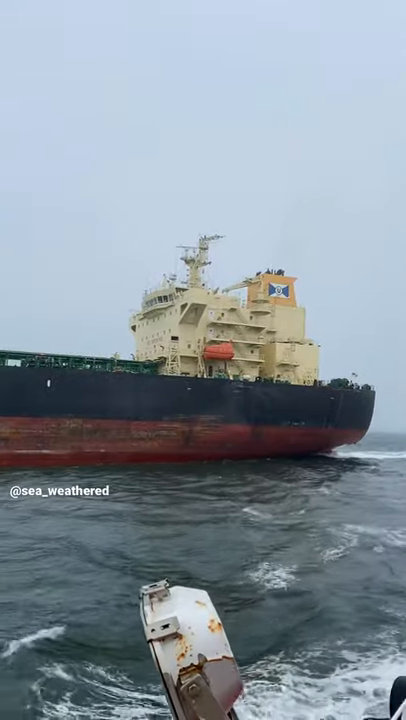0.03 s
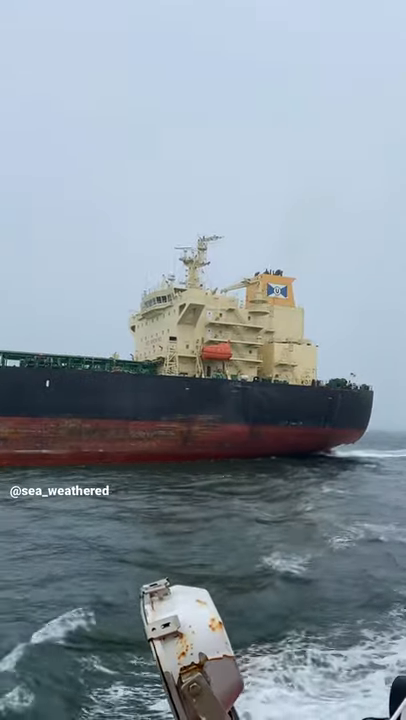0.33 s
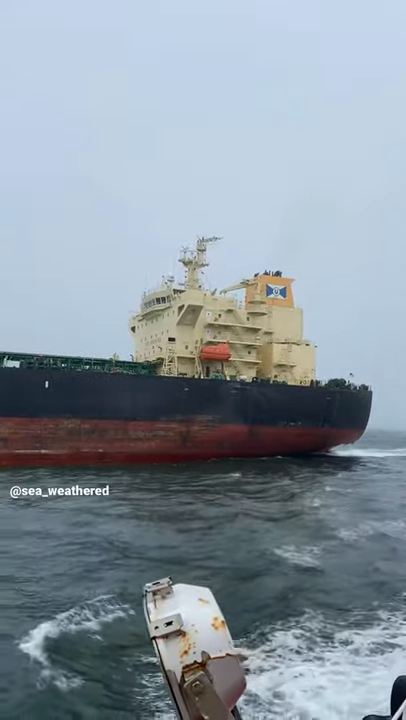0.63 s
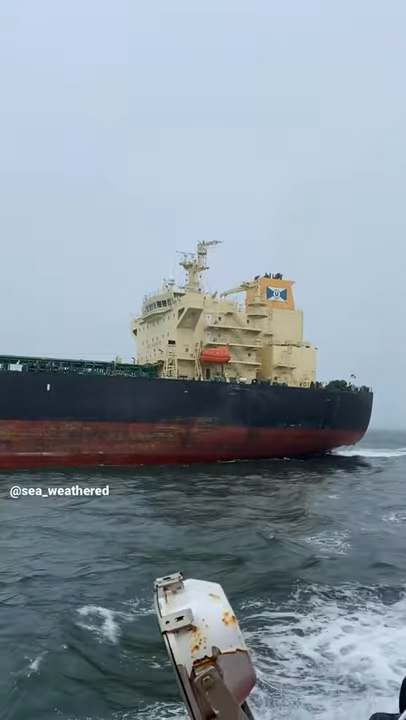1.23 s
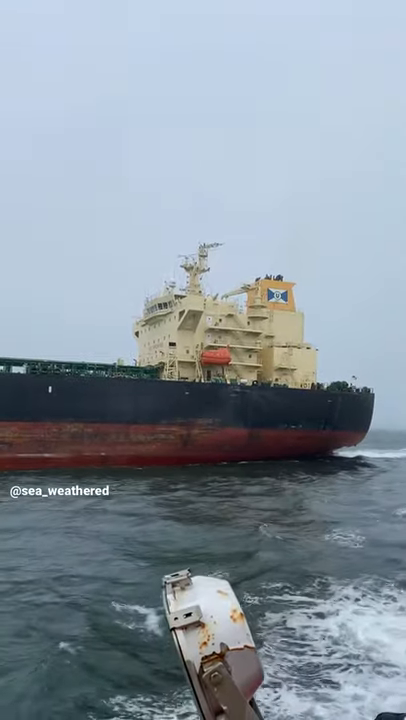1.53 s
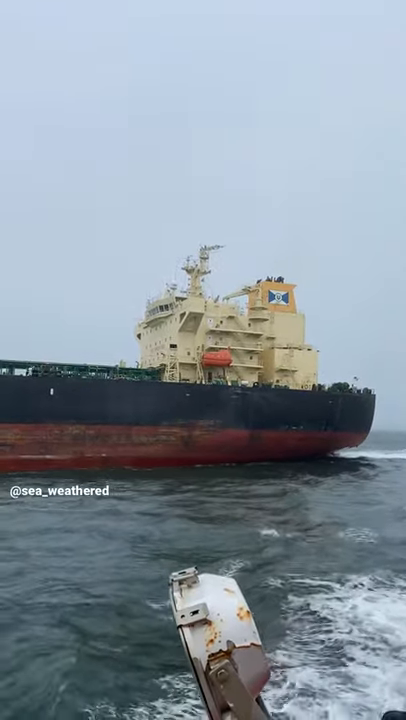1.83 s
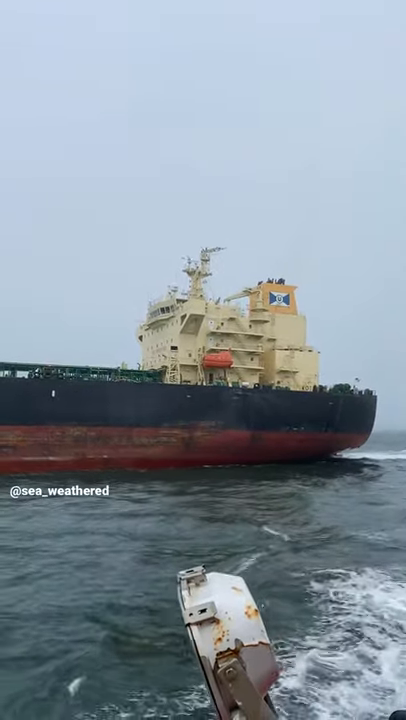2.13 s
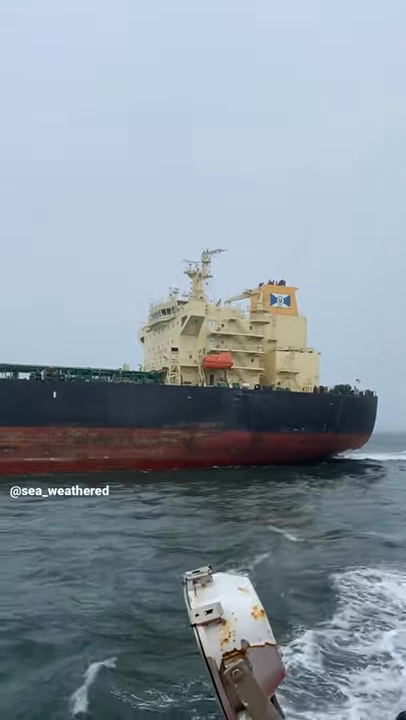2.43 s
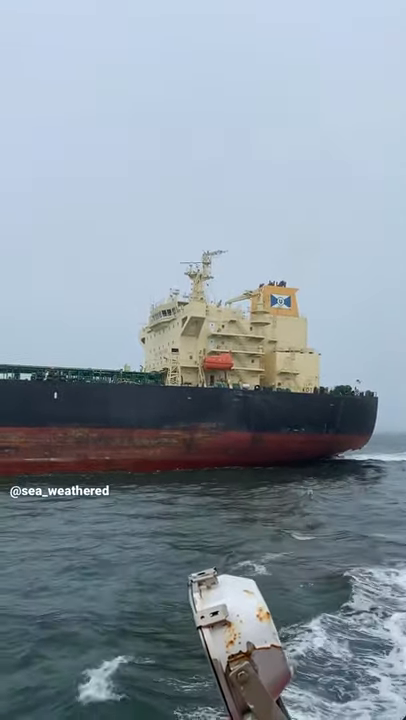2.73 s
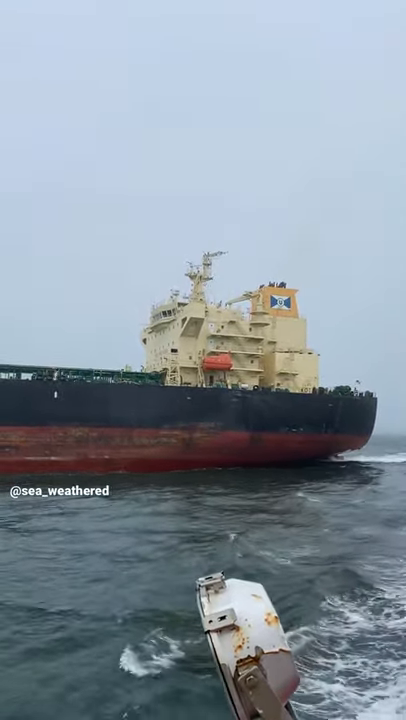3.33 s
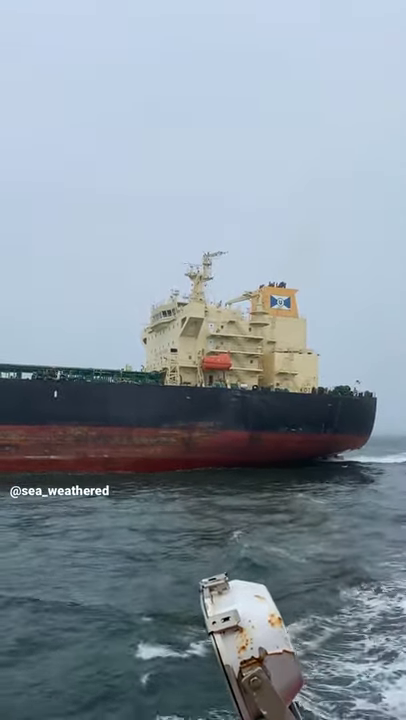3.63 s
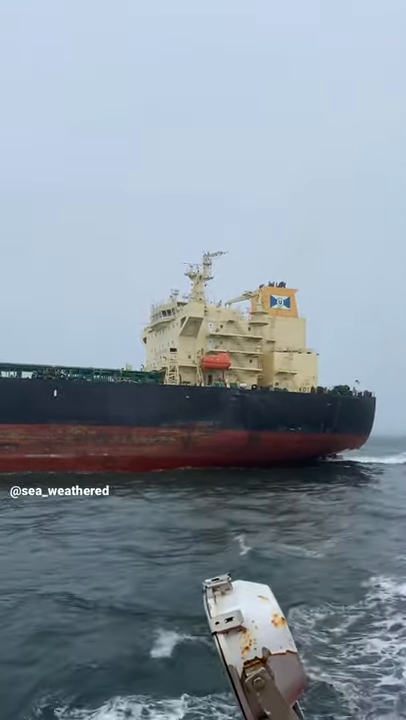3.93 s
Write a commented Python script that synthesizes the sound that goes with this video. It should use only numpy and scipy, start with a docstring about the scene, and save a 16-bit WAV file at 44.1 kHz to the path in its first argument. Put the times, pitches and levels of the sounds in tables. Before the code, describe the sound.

One long, deep ship horn blast carries across the water above a small boat's engine.

```python
"""A small boat's engine drones over the wash of water. Then a tanker sounds one long, deep horn blast across a
foggy bay, and the engine and wash drop in level beneath it. The horn catches with a puff of air, mostly on its
second and third partials (tones at whole multiples of its pitch), overshoots in pitch and settles near 128 Hz.
Its sound crosses the water by several shifting paths, so the partials swell and fade."""
import sys
import numpy as np
from scipy import signal
from scipy.fft import rfft, irfft
from scipy.io import wavfile
from scipy.ndimage import uniform_filter1d, minimum_filter1d

SR = 44100
rng = np.random.default_rng(int(sys.argv[2]) if len(sys.argv) > 2 else 0)


def generate_wav(signal):
    """Clip the signal to [-1, 1] and save it as 16-bit WAV at the path in sys.argv[1]."""
    frames = np.transpose(np.atleast_2d(signal))
    scaled = np.clip(frames, -1, 1) * 32767
    pcm = np.round(scaled).astype(np.int16)
    wavfile.write(sys.argv[1], SR, pcm)


N = 176400

# the horn's pitch: t/s, f/Hz
HORN_PITCH = [(.66, 130), (.705, 125.3), (.78, 131), (.85, 129.2), (.95, 128.4), (1.8, 128.05),
              (3.2, 127.95), (4, 127.7)]
SETTLED_HZ = HORN_PITCH[-1][1]
TIME = np.arange(N) / SR


def from_db(db):
    """Turn decibels into a gain to multiply by."""
    return 10 ** (np.asarray(db) / 20)


def rms_one(x):
    """Scale a signal so its average strength (rms) is 1."""
    return x / np.sqrt(np.mean(np.abs(x) ** 2) + 1e-20)


def in_time(rows):
    """Join (time, value) points with straight lines, one value per sample."""
    return np.interp(TIME, *np.transpose(rows))


def at_hz(points, hz, column=1):
    """Read a table at any frequency, with octaves evenly spaced."""
    points = np.array(points)
    return np.interp(np.log(hz), np.log(points[:, 0]), points[:, column])


def swell(peak_s, width_s):
    """A bell-shaped rise and fall."""
    return np.exp(-.5 * ((TIME - peak_s) / width_s) ** 2)


def drift(rate_hz):
    """A smooth random wobble, about 1 in size."""
    step = 100  # samples between random points
    pole = np.exp(-2 * np.pi * step * rate_hz / SR)
    white = rng.standard_normal(N // step + 1002)
    slow = signal.lfilter([1], [1, -2 * pole, pole * pole], white)[1000:]
    return np.interp(np.arange(N) / step, np.arange(len(slow)), rms_one(slow))


def scatter(rate_hz):
    """A gain that wanders in size and in phase (position in the wave's cycle)."""
    return (drift(rate_hz) + 1j * drift(rate_hz)) / np.sqrt(2)


def noise_bands():
    """Half-octave bands of stereo noise; left and right are alike in the bass, opposite at the top."""
    # left-right likeness: f/Hz, likeness (clipped below to -1..1)
    likeness = [(300, 0.91), (700, 0.72), (3500, 0.54), (7800, -2.7)]
    edges = 22 * 2 ** np.arange(0, 9.6, .5)
    white, bands = rng.standard_normal((2, 2, N)), []
    for k, (low, high) in enumerate(zip(edges, edges[1:])):
        bandpass = signal.butter(2, [low, high], "band", fs=SR, output="sos")
        mid, side = signal.sosfilt(bandpass, white[k % 2])
        hz = np.sqrt(low * high)
        alike = np.clip(at_hz(likeness, hz), -1, 1)
        bands.append((hz, np.sqrt(1 + alike) * mid + np.sqrt(1 - alike) * side * [[1], [-1]]))
    return bands


def shaped_noise(bands, spectrum, flicker_db=0):
    """Mix the noise bands to follow a spectrum, each flickering if asked; rms 1."""
    mix = 0
    for hz, band in bands:
        flicker = flicker_db * drift(6.9) if flicker_db else 0
        mix += band * from_db(at_hz(spectrum, hz) + flicker)
    return rms_one(mix)


def wash(bands):
    """Water washing around the boat: a soft, flickering hiss."""
    # tone colour of the water: f/Hz, relative level/dB
    spectrum = [(300, 3), (750, -2.5), (1500, -5.5), (2500, -18.5), (5000, -18.5), (8000, -16.5),
                (11000, -27), (15000, -43)]
    # loudness of the water: t/s, level/dB
    level = [(0, -32.5), (.4, -32), (.62, -28.5), (1.1, -40.5), (2.4, -42)]
    return from_db(in_time(level)) * shaped_noise(bands, spectrum, flicker_db=3)


def engine(bands):
    """The engine's firing makes a strong low tone, over weaker steady tones and a rumble."""
    # the firing tone and the rest of the drone, both lower under the horn: t/s, level/dB
    firing_level = [(0, -12), (.62, -9), (.72, -17.5), (1.6, -17.5), (2.35, -28.5), (2.65, -26.5), (3, -19),
                    (3.6, -15.5)]
    drone_level = [(0, -17), (.6, -22.5), (.76, -37), (2.4, -33)]
    # the engine room's steady tones and the rumble's tone colour: f/Hz, relative level/dB
    steady_tones = [(80.5, -1.5), (113.8, -8), (141, 1.5), (172, -16.5)]
    rumble_spectrum = [(25, -31.5), (45, 3.5), (100, -4), (145, 0.5), (200, -6.5), (400, -39)]
    firing_hz = 65.6
    angle = 2 * np.pi * TIME
    hum = sum(from_db(db + drift(1.9)) * np.sin(hz * angle + 2 * np.pi * rng.random())
              for hz, db in steady_tones)
    drone = np.sqrt(2) * hum + from_db(-11) * shaped_noise(bands, rumble_spectrum)
    firing = np.sqrt(2) * np.sin(firing_hz * angle + 2 * np.pi * rng.random())
    return from_db(in_time(firing_level)) * firing + from_db(in_time(drone_level)) * drone


def rasp(bands):
    """A brief fizzy rasp over the loud start of the blast."""
    # tone colour of the fizz: f/Hz, relative level/dB
    spectrum = [(500, -0.5), (1800, -10), (3000, -19), (6500, -21), (11000, -47)]
    return from_db(-30) * swell(peak_s=.81, width_s=.07) * shaped_noise(bands, spectrum)


def air_puff(bands):
    """A dull puff of air as the horn's valve opens."""
    # tone colour of the puff: f/Hz, relative level/dB
    spectrum = [(150, -16), (300, -1), (1100, -6.5), (2800, -13.5), (5000, -26)]
    lowpass = signal.butter(4, 5500, fs=SR, output="sos")
    puff = signal.sosfilt(lowpass, shaped_noise(bands, spectrum))
    return from_db(-19.5) * swell(peak_s=.683, width_s=.021) * puff


def partial(cycles, k, gain):
    """The tone at k times the horn's pitch, in stereo; higher ones stray more in phase."""
    # left ear compared with right: f/Hz, phase lead/rad, level/dB
    ears = [(128, 0, 0.97), (256, -0.25, -0.5), (400, -0.39, 1.4), (534, 1, 7.5), (715, -1.2, -3.5),
            (870, -0.43, -1.7), (1500, -0.39, 0)]
    hz = k * SETTLED_HZ
    left = np.exp(.5j * at_hz(ears, hz)) * from_db(at_hz(ears, hz, column=2) / 2)
    phase = k * (2 * np.pi * cycles + .35 * rng.standard_normal())
    wave = -np.sqrt(2) * gain * np.exp(1j * phase)
    return np.real(wave * np.array([[left], [1 / left]]))


def fading_partial(cycles, k, level, share):
    """A partial on its level curve; a share of it fades slowly and flutters quickly."""
    fade_hz, flutter_hz, ear_gap_per_khz = 1.64, 8, .1
    ear_gap = ear_gap_per_khz * k * SETTLED_HZ / 1e3 * scatter(fade_hz)
    wander = scatter(fade_hz) + .6 * scatter(flutter_hz) + ear_gap * [[1], [-1]]
    return partial(cycles, k, from_db(in_time(level)) * rms_one(1 + share * wander))


def fade_in_groups(x):
    """Moving air lets neighbouring partials swell and fade together while the overall level holds."""
    octave = np.log2(np.maximum(np.arange(N // 2 + 1) * SR / N, 1))
    centres = np.arange(np.log2(1900), np.log2(9000), .11)
    spectrum, faded, fade_db = rfft(x), 0, 3.2
    for one_group in np.eye(len(centres)):
        band = spectrum * np.interp(octave, centres, one_group)
        if np.abs(band).max() > .03 * np.abs(spectrum).max():  # skip nearly empty groups
            faded += irfft(band, N) * from_db(fade_db * drift(rate_hz=2))
    power = uniform_filter1d(faded ** 2, size=SR // 8, axis=1)
    return faded / np.sqrt(power + 1e-20)


def scattered_pulses(cycles, spectrum, paths=10):
    """The sharp edge of each horn pulse arrives by several paths whose lengths wander; rms 1."""
    size = 4096  # points in one cycle
    spread_s, wander_s, jitter_s = .0234, .00013, .000008
    hz = np.maximum(np.arange(size // 2 + 1) * SETTLED_HZ, 1)
    in_range = (hz > spectrum[0][0]) & (hz < spectrum[-1][0])
    pulse = irfft(from_db(at_hz(spectrum, hz)) * in_range)
    arrivals = np.zeros((2, N))
    for channel in arrivals:
        for _ in range(paths):
            delay_s = spread_s * rng.random() + wander_s * drift(1.5) + jitter_s * drift(45)
            channel += pulse[((cycles - delay_s * SETTLED_HZ) * size).astype(int) % size]
    return fade_in_groups(arrivals)


def horn_blare(cycles):
    """The horn's sharp pulses give a bright blare with a thin buzz above it."""
    # tone colours of the blare and the buzz: f/Hz, relative level/dB
    blare_spectrum = [(1900, 1.5), (2150, 4), (2450, -1), (3100, -2), (3900, -7.5)]
    buzz_spectrum = [(3900, 8), (4600, 8.5), (5500, 5), (6500, -1), (8000, -10.5), (9000, -40)]
    # how each swells and fades: t/s, relative level/dB
    blare_level = [(.8, -31), (1.2, -34), (1.45, -28.5), (1.9, -35), (2.65, -28), (3.3, -32.5),
                   (3.9, -27.5)]
    buzz_level = [(.78, -40), (.87, -35.5), (.97, -44.5), (1.7, -42), (1.95, -46), (2.8, -37.5),
                  (3.3, -47.5), (3.65, -37), (4, -45)]
    blare = scattered_pulses(cycles, blare_spectrum)
    blare = rms_one(blare + .16 * blare[::-1])  # each ear hears a little of the other's paths
    buzz = scattered_pulses(cycles, buzz_spectrum)
    return blare * from_db(in_time(blare_level) - 2) + buzz * from_db(in_time(buzz_level) + 3)


def horn_body(cycles):
    """The horn's pulsing air makes a steady lowest tone and a stack of fading partials."""
    # loudness of single partials: t/s, level/dB
    second = [(.8, -16), (1.35, -18), (1.8, -19.5), (2.3, -23), (2.6, -18.5), (3.4, -19.5), (4, -25)]
    third = [(.8, -21), (.9, -16), (1.6, -19), (2.699, -20.5), (3.5, -26.5), (4, -24)]
    fourth = [(.8, -21), (1.5, -31.5), (1.75, -26.5), (2, -30.5), (2.1, -49), (2.3, -26.5), (3.35, -30.5),
              (3.55, -43.5), (3.75, -33.5)]
    fifth = [(.8, -25.5), (1.1, -30.5), (1.6, -41), (2.55, -33.5), (3.05, -40.5), (3.33, -32),
             (3.55, -34.5), (3.8, -32)]
    sixth = [(.8, -22), (1.05, -30), (1.4, -26.5), (1.8, -41), (2.3, -31), (2.6, -34.5), (2.8, -29.5),
             (3.2, -40.5), (3.45, -32.5)]
    tenth = [(.8, -27), (1.15, -23), (1.6, -40), (2.101, -42), (2.4, -29.5), (3.05, -32.5), (3.5, -48)]
    eleventh = [(1.301, -43), (3.299, -40), (3.65, -32.5)]
    # loudness of the ringing, brassy and bright groups of partials: t/s, relative level/dB
    ring_level = [(.78, -27.5), (.88, -36), (1.05, -24), (1.35, -37), (1.6, -28), (2.551, -30.5),
                  (2.9, -22.5), (3.4, -33), (4, -39)]
    brass_level = [(1.08, -27), (1.3, -39.5), (2.7, -37.5), (3.1, -35), (3.35, -40.5), (3.9, -35.5)]
    bright_level = [(.9, -41), (1.85, -42.5), (2.05, -42), (2.58, -29), (2.85, -42), (3.1, -37.5),
                    (3.5, -50)]
    # members of each group: partial number, added level/dB
    ring = [(7, -3.5), (8, 0.5)]
    brass = [(9, -5.5), (12, -3), (13, -0.5)]
    bright = [(14, 2), (17, -4), (19, -9)]
    tone = partial(cycles, k=1, gain=from_db(-20.5))
    for k, level, share in [(2, second, .15), (3, third, .15), (4, fourth, .15), (5, fifth, .69),
                            (6, sixth, .69), (10, tenth, .4), (11, eleventh, .4)]:
        tone += fading_partial(cycles, k, level, share)
    for group, level, share in [(ring, ring_level, .4), (brass, brass_level, .95),
                                (bright, bright_level, .4)]:
        for k, db in group:
            tone += from_db(db) * fading_partial(cycles, round(k), level, share)
    return tone


def horn():
    """The horn catches on single partials; at first it sounds slightly louder, until the level steps down."""
    # short blips as the horn catches: t/s, partial number, level/dB, width/s
    blips = [(.668, 2, -4, 0.018), (0.711, 3, -7, .026), (0.755, 2, -14, 0.024), (.678, 8, -21.5, 0.016)]
    start_s, attack_s = .725, .04
    loud_start_db, level_drop_s, level_drop_length_s = 2.2, .925, .004
    cycles = np.cumsum(in_time(HORN_PITCH)) / SR  # vibrations counted so far
    fade_in = np.clip((TIME - start_s) / attack_s, 0, 1)
    loud_start = from_db(loud_start_db * np.clip((level_drop_s - TIME) / level_drop_length_s, 0, 1))
    tone = horn_body(cycles) + fade_in * horn_blare(cycles)  # the blare builds later than the body
    catch = sum(partial(cycles, round(k), from_db(db) * swell(peak_s, width_s))
                for peak_s, k, db, width_s in blips)
    return fade_in * loud_start * tone + catch


def scene():
    """Wash and engine run throughout; the horn joins when its air valve opens."""
    valve_s, opening_s = .661, .008
    bands = noise_bands()
    water = wash(bands)
    valve = np.clip((TIME - valve_s) / opening_s, 0, 1)
    blast = valve * (horn() + air_puff(bands) + rasp(bands))
    return water + engine(bands) + blast


def record(dry):
    """A fast limiter turns down the highest peaks, and a filter cuts the very top of the treble."""
    ceiling, window_s, cutoff_hz = .92, .004, 15500
    size = int(window_s * SR)
    needed_gain = ceiling / np.maximum(np.abs(dry).max(axis=0), ceiling)
    smooth_gain = uniform_filter1d(minimum_filter1d(needed_gain, size), size)
    lowpass = signal.cheby2(12, 70, cutoff_hz, fs=SR, output="sos")
    return signal.sosfilt(lowpass, dry * smooth_gain)


dry = scene()
out = record(dry)
generate_wav(out)
```